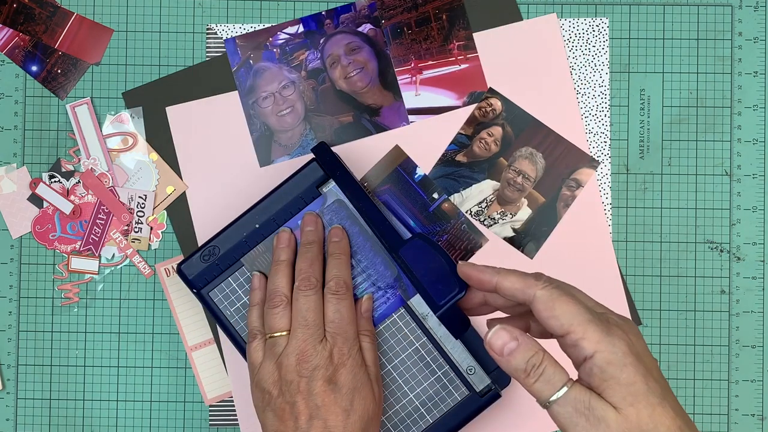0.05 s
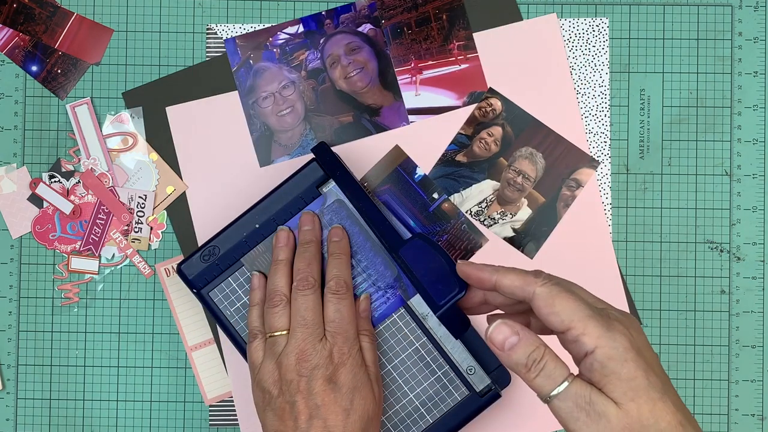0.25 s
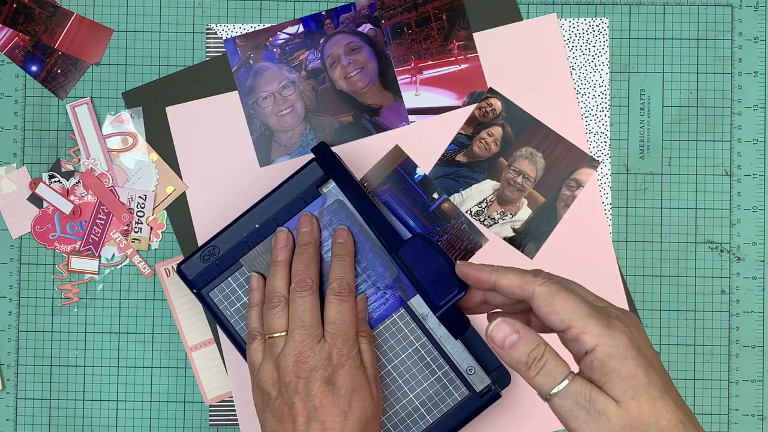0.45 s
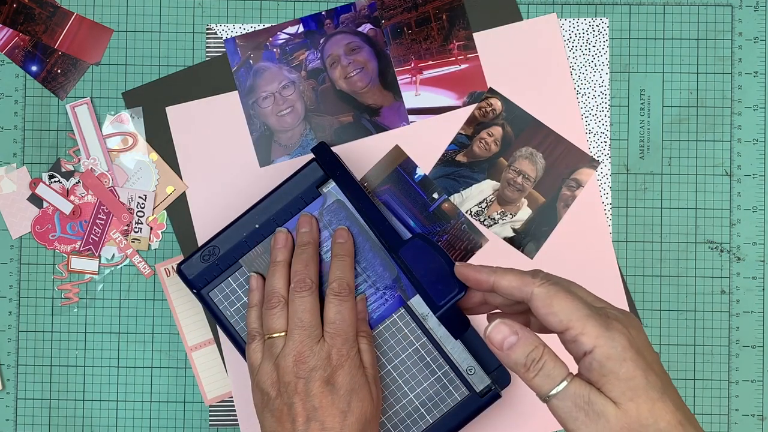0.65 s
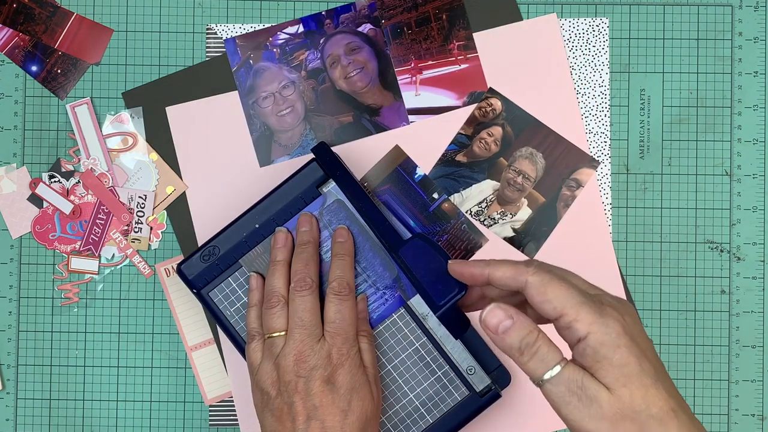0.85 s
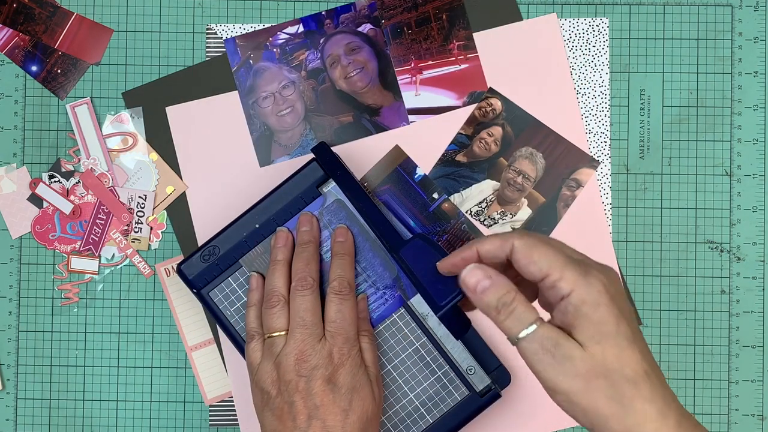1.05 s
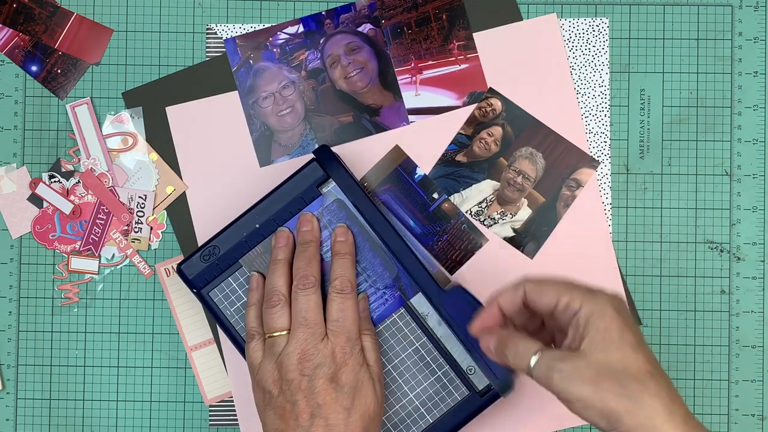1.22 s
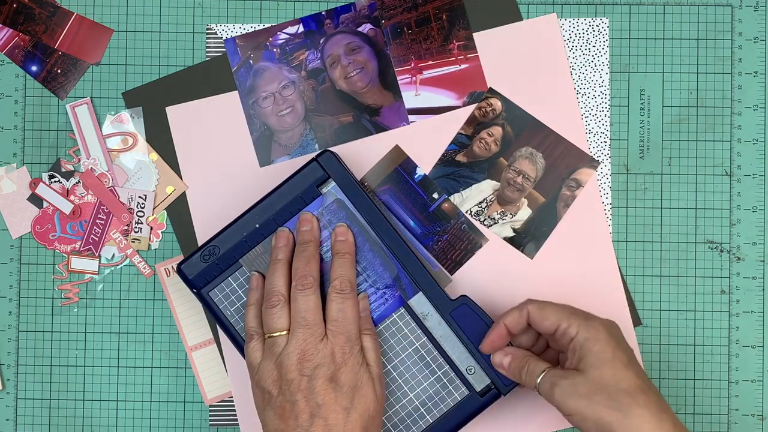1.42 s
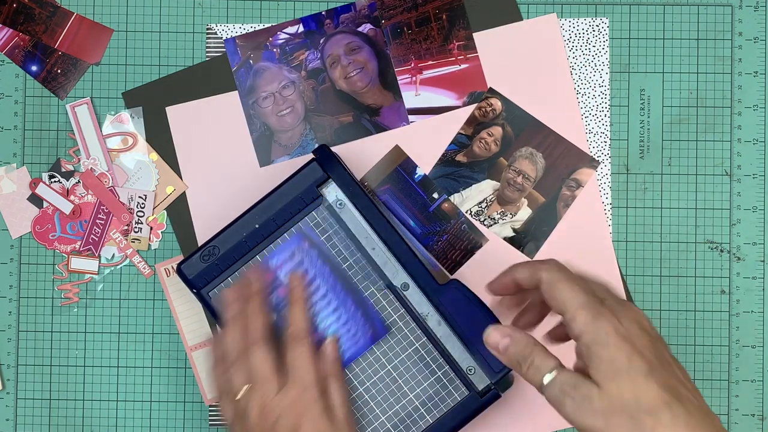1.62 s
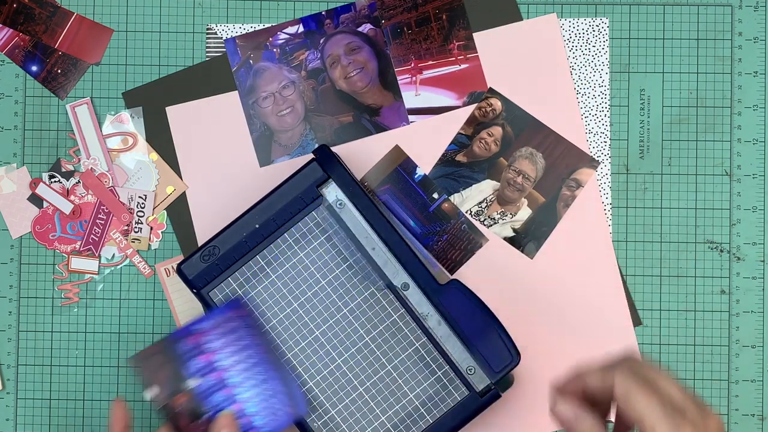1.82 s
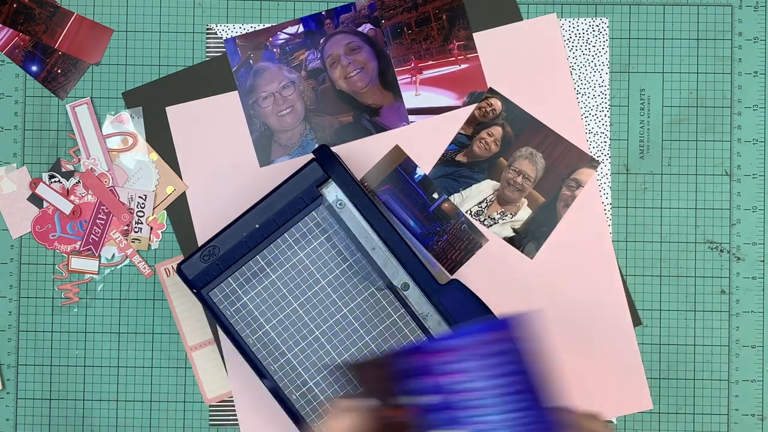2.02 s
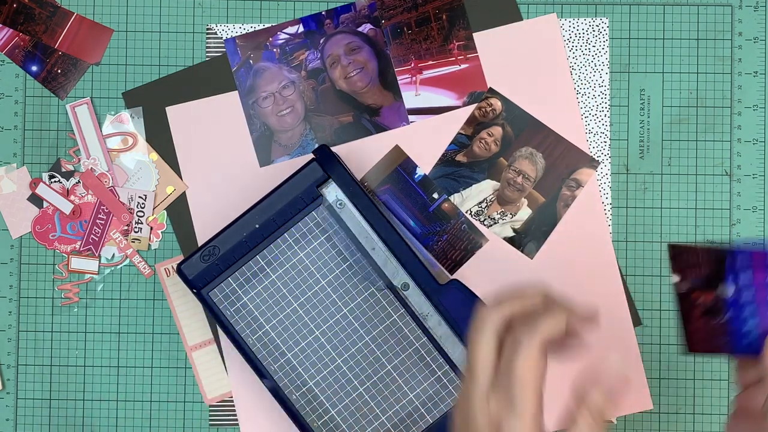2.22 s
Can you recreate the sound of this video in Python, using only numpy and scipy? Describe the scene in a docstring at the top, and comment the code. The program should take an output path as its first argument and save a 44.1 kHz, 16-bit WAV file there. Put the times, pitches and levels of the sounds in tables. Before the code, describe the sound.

For the first second there is only the faint low rumble of a small room. At about 1.1 seconds the carriage of a plastic paper trimmer clicks lightly. From 1.2 seconds its blade rasps through a photo print, rapidly getting faster and louder, with a tiny squeak near the peak. At about 1.35 seconds the carriage slams into the end stop, by far the loudest moment: a sharp clack, a short rattle and a hollow thump that briefly overload the close microphone, while the desk booms faintly. A small knock follows at 1.5 seconds. Then the glossy print hisses softly over the trimmer bed as fingers rub and grip it. It pops once through a bend at about 1.85 seconds, slightly to the left. Faint sliding, rustling and light taps continue until about 2.3 seconds as it is carried away.

```python
"""A plastic paper trimmer cuts a photo print, heard from close above a craft desk in a small room.
The carriage clicks down and its blade rasps faster and faster as fibres snap and shake the rail.
It slams into the end stop: the shell rattles, the hollow bed thumps and the microphones overload.
The hands let go; the print hisses over the bed, pops through a bend and is carried away.
Underneath, the desk booms faintly and the room hums with a low rumble."""
import sys
import numpy as np
from scipy import signal
from scipy.fft import rfft, irfft, next_fast_len
from scipy.io import wavfile

SR = 44100
rng = np.random.default_rng(int(sys.argv[2]) if len(sys.argv) > 2 else 0)


def unload_wav(signal):
    """Save mono or channel-first audio to the path in sys.argv[1] as 16-bit WAV at rate SR, clipped to [-1, 1]."""
    wavfile.write(
        sys.argv[1],
        SR,
        np.round(np.clip(np.atleast_2d(signal).T, -1, 1) * 32767).astype(np.int16),
    )


N = 99886
TIME = np.arange(N) / SR

# tone of the cut's rasp: freq_hz, relative_db
RASP_EQ = [(80, -14), (250, -2.5), (380, -6), (600, -2), (1250, -6.5), (1700, -3), (3500, 0), (5200, 6),
           (7500, -3.5), (10500, -4), (16000, -5.5)]
# hollow scrape of the runner in its groove: freq_hz, relative_db
SCRAPE_EQ = [(150, -7), (330, -7.5), (500, -2), (850, -4), (1060, -1), (1250, -13), (1600, -3.5),
             (2600, -13), (6000, -29)]
# resonances of the rail under the blade: pitch_hz, width_hz, boost_db
RAIL_PEAKS = [(475, 110, 7), (750, 70, 4.5), (1037, 140, 5.5), (1520, 82, 5), (1790, 69.7, 9),
              (2300, 200, 1), (3384, 180, 9.5), (4344, 110, 10.5), (8490, 750, 5)]
# two blade squeaks, then a finger dragging on the bed: start_s, length_s, pitch_hz, level_db, left_db
SQUEAKS = [(1.295, .014, 1578, -21, 8), (1.294, .013, 2445, -21, 0), (1.54, .038, 520, -38.5, 2)]
# clicks of fingers, carriage and blade: faint finger ticks, the carriage's clicks and rattles, and the blade
# snapping out of the print's edge: start_s, level_db, length_s, low_cut_hz, high_cut_hz, ring_hz
CLICKS = [(0.972, -53, 0.0099, 1198, 2896, 2300), (1.01, -54.5, 0.025, 1196, 2595, 2300),
          (1.038, -53.5, 0.0077, 1200, 2500, 3350), (1.094, -24, 0.007, 1200, 14900, 3350),
          (1.166, -41, 0.009, 1504, 12000, 4100), (1.314, -20, 0.0062, 5450, 14000, 8400),
          (1.3333, -13, 0.013, 498, 5500, 2850), (1.339, 1.5, 0.007, 250, 9600, 3000),
          (1.346, -18, 0.0057, 700, 3500, 2030), (1.361, -22.5, 0.027, 408, 8980, 1960),
          (1.4909, -28.5, 0.011, 610, 1300, 1030), (1.68, -45.5, 0.0034, 200, 1500, 500),
          (2.161, -40, 0.0059, 500, 1990, 1800)]
# tone of hard plastic contact: freq_hz, relative_db
PLASTIC_EQ = [(100, -6.5), (450, 4.5), (900, -9), (1500, -4.5), (3300, 0.5), (5200, -2), (8000, -3.5),
              (11000, -8), (16000, -1.5)]
# resonances of the carriage's shell: pitch_hz, width_hz, boost_db
SHELL_PEAKS = [(715, 36, 4.5), (1046, 150, 8), (1540, 130, 9), (2080, 160, 7.5), (2360, 71, 5.5),
               (2843, 170.5, 2.5), (3428, 100, 5.5), (4100, 260, 9.5), (6660, 400, 4.5), (8370, 1000, 7)]
# blows on the trimmer bed: start_s, level_db, high_cut_hz, low_cut_hz
BED_KNOCKS = [(1.096, -49.5, 710, 396), (1.309, -19, 295, 40.2), (1.339, -37, 643, 470),
              (1.3436, 9.5, 270, 41), (1.366, -14, 380, 40.4), (1.4986, -18, 670, 439),
              (2.105, -38, 615, 99.7), (2.246, -41.5, 280, 97.2)]
# modes of the bed: pitch_hz, level_db, t60_s
BED_MODES = [(235.6, -3, 0.056), (256, -1, 0.07), (296, -17, 0.12), (413.6, -8, 0.08), (508, -4.5, 0.088),
             (693, -10.5, 0.065)]
# pulls of the print over the bed: start_s, length_s, level_db, attack_s
PRINT_SLIDES = [(1.48, 0.0047, -43.5, .003), (1.5, 0.075, -56.5, 0.03), (1.559, 0.072, -36.5, 0.054),
                (1.625, 0.022, -35, 0.022), (1.643, 0.17, -43, 0.023), (1.79, 0.015, -36.5, 0.014),
                (1.834, 0.049, -52.5, 0.011), (1.928, 0.14, -50.5, 0.054), (2.134, 0.08, -44.5, 0.018)]
# hiss of sliding glossy paper: freq_hz, relative_db
SLIDE_EQ = [(500, -30), (1200, -16.5), (3000, -10.5), (5200, -4), (7500, 0), (13500, 1.5), (16000, -2)]
# fingers rubbing on the bed: start_s, length_s, level_db
FINGER_RUBS = [(1.489, 0.085, -42), (1.601, 0.1, -50), (1.765, 0.025, -50.5), (1.849, 0.007, -31.5),
               (2.095, 0.017, -46.5), (2.134, 0.093, -49)]
# dull tone of that rubbing: freq_hz, relative_db
RUB_EQ = [(60, -2), (150, 4.5), (300, 6), (420, 4), (520, 3.5), (650, -14.5), (1200, -7.5), (4000, -39.5)]
# fingers gripping the print: start_s, length_s, level_db
FINGER_GRIPS = [(1.515, 0.17, -50.5), (1.568, 0.037, -50), (1.767, 0.1, -50), (1.823, 0.01, -44),
                (1.886, 0.0173, -47.5), (1.942, 0.119, -59.5), (2.065, 0.013, -48), (2.131, 0.04, -43.5),
                (2.208, 0.017, -44)]
# tone of the print's rustle: freq_hz, relative_db
RUSTLE_EQ = [(300, -36), (900, -3.5), (1500, -1.5), (2500, -1), (4500, 0.5), (9000, -15)]
# pops of the buckling print: start_s, level_db
PRINT_POPS = [(1.8352, -42), (1.8434, -24.5), (1.8555, -40.5)]
# modes of the bent print: pitch_hz, level_db, t60_s
PRINT_MODES = [(325, -10, 0.092), (467, -36, 0.06), (665, -13.5, 0.12), (1000, -5, 0.038),
               (1206, -2.5, 0.049), (1240, 9.5, 0.0072), (1440, -2, 0.041), (2175, -2, 0.036),
               (2500, -1, 0.048)]
# shoves on the desk: start_s, level_db
DESK_SHOVES = [(1.0, -45), (1.16, -46.5), (1.21, -46.5), (1.53, -46), (1.309, -27.5), (1.347, -22),
               (1.366, -49), (1.43, -36.5), (1.625, -43.5), (1.678, -39), (1.72, -44), (1.758, -46.5),
               (1.845, -46)]
# modes of the desk top: pitch_hz, level_db, t60_s
DESK_MODES = [(52.7, 7.5, 0.21), (40, -15, 0.074), (83.2, -12, 0.027)]
# how far the left microphone port leads the right: freq_hz, lead_rad
PORT_PHASE = [(100, 1.5), (500, -0.4), (1800, 1.19), (2500, 0.25), (3700, 4.5), (5300, 2.5), (7000, 0.78),
              (8600, 0.5), (10400, -4), (13500, -5.5), (16000, -8.5)]
# strength of the room's tail: freq_hz, level_db
REVERB_EQ = [(130, -13), (260, -15), (550, -5.5), (2000, -6.5), (6000, -10), (14000, -18)]
# decay of the room's tail: freq_hz, t60_s
REVERB_DECAY = [(100, 0.29), (400, 0.24), (2000, 0.27), (6000, 0.33), (15000, 0.27)]
# tone of the still room: freq_hz, relative_db
ROOM_TONE_EQ = [(20, -20.5), (35, -13.5), (53, 4), (80, -14), (130, -15), (250, -21.5), (500, -31.5),
                (1200, -38.5), (4000, -43.5), (15000, -47)]

PUSH_S, STOP_S = 1.165, 1.338   # the carriage sets off; it meets the end stop


def blade():
    """Fibres snap and shake the rail; rasp, grain rate, scrape and rumble climb with the speed."""
    speed = np.interp(TIME, [PUSH_S, STOP_S], [.17, 1])   # share of the final speed
    moving = (TIME > PUSH_S) * (TIME < STOP_S)
    glide = from_db(-33.5) * speed * moving
    snaps_per_s = 20000 * speed
    fibres = grains(snaps_per_s, spread_db=1.6) * flutter(hz=150, depth_db=1.0)
    tearing = fibres * together([glide, bite(TIME)])
    crackle = soften(grains(snaps_per_s, spread_db=4.0), 7500, "high")
    coating = crackle * bite(TIME - 0.011)   # the gloss parts just after the fibres
    rumble_hz = 360.3 + 1136 * speed ** 2   # the rail's roughness passes ever faster under the runner
    rumble = from_db(-1) * rms_one(slow_noise(hz=100) * np.cos(phase(rumble_hz))) * glide * np.sqrt(speed)
    scrape = from_db(-36) * rng.standard_normal(N) * speed ** (3 / 4) * moving
    return colour(tearing + coating + rumble, RASP_EQ, RAIL_PEAKS) + colour(scrape, SCRAPE_EQ, RAIL_PEAKS)


def bite(time, deepest_s=1.303, hold_s=0.012, rise_db_per_s=322.5, fall_db_per_s=1598):
    """Envelope of the cut: it deepens, holds and drops as the blade leaves the print."""
    entering_db = rise_db_per_s * np.maximum(deepest_s - time, 0)
    leaving_db = fall_db_per_s * np.maximum(time - deepest_s - hold_s, 0)
    return from_db(-13 - entering_db - leaving_db)


def squeak(start_s, length_s, pitch_hz, level_db, left_db):
    """Stick-slip makes one resonance swell and sing for a moment, its pitch wavering slightly."""
    wavering_hz = pitch_hz * (1 + .01 * rms_one(slow_noise(hz=81.3)))
    tone = rms_one(np.sin(phase(wavering_hz)))
    swell = gesture(start_s, length_s, level_db, attack_s=length_s, release_db_per_s=900.5)
    return pan(tone * swell, left_db)


def carriage():
    """Fingers tick faintly, the carriage clicks on its rail, the blade snaps out of the print's edge, and the
    carriage rattles after hitting the end stop."""
    return colour(sum(chatter(*row) for row in CLICKS), PLASTIC_EQ, SHELL_PEAKS)


def chatter(start_s, level_db, length_s, low_cut_hz, high_cut_hz, ring_hz):
    """A dying burst of plastic on plastic; the touched part rings on two modes of its own."""
    dying = np.exp(-(TIME[:SR // 10] / length_s) ** 2)
    contact = band_limit(flat_burst(dying, len(dying)), low_cut_hz, high_cut_hz)
    ringing = sum(from_db(db) * signal.lfilter(*signal.iirpeak(hz, Q=16, fs=SR), contact)
                  for hz, db in [(ring_hz, 3), (ring_hz * 1.23, 0.5)])
    click = from_db(level_db) * rms_one(contact + ringing) * np.sqrt(np.mean(dying ** 2))
    return np.pad(click, (int(start_s * SR), N))[:N]


def bed():
    """The hollow bed thumps; a soft contact leaves out its higher modes, a light one its lowest."""
    blows = sum(band_limit(taps([(start_s, level_db)]), low_cut_hz, high_cut_hz)
                for start_s, level_db, high_cut_hz, low_cut_hz in BED_KNOCKS)
    return ring(blows, BED_MODES)


def handling():
    """Glossy paper hisses over the bed while fingers rub; gripping and sliding both rustle the print."""
    sliding = together(gesture(*row, release_db_per_s=338) for row in PRINT_SLIDES)
    rubbing = together(gesture(*row) for row in FINGER_RUBS)
    gripping = together(gesture(*row) for row in FINGER_GRIPS)
    bending = together([gripping, from_db(-19.5) * sliding])
    hiss = grains(10000, spread_db=-0.5) * flutter(hz=35, depth_db=1.2) * sliding
    rub = rng.standard_normal(N) * rubbing
    rustle = grains(2300, spread_db=-2.0) * flutter(hz=49.9, depth_db=2.5) * bending
    return colour(hiss, SLIDE_EQ) + colour(rub, RUB_EQ) + colour(rustle, RUSTLE_EQ)


def buckle():
    """The stiff print pops through a bend as it is lifted."""
    return ring(soften(taps(PRINT_POPS), hz=1700, order=4), PRINT_MODES)


def desk():
    """The desk top booms faintly under every shove."""
    return ring(soften(taps(DESK_SHOVES), hz=109.6), DESK_MODES)


def microphones(x, desk_db, desk_t60_s, low_hz=898, high_hz=7700):
    """Two ports hear the sound out of step; in the mids each gets its own quick desk reflections."""
    size, hz = fft_grid()
    dying = from_db(-60 * TIME[:SR // 20] / desk_t60_s)
    scatter = flat_burst(dying, (2, len(dying)))
    scatter /= np.sqrt(np.sum(scatter ** 2, axis=1, keepdims=True))
    reflected = from_db(desk_db) * hz ** 2 / (hz ** 2 + low_hz ** 2) / (1 + (hz / high_hz) ** 4)
    direct = np.exp(.5j * at_hz(PORT_PHASE, hz) * np.array([[1], [-1]]))
    response = np.sqrt(1 - reflected ** 2) * direct + reflected * rfft(scatter, size)
    return irfft(rfft(x, size) * response)[:, :N]


def reverb(x, build_s):
    """The small room's diffuse tail, unrelated in each ear, dies away band by band."""
    age, tail = TIME[:SR * 2 // 3], 0
    edges_hz = np.geomspace(100, 18000, 11)
    white = rng.standard_normal((2, 2, len(age)))
    for k, (low, high) in enumerate(zip(edges_hz, edges_hz[1:])):
        hz = np.sqrt(low * high)
        decay = from_db(-60 * age / at_hz(REVERB_DECAY, hz)) * (1 - np.exp(-age / build_s))
        band = signal.sosfilt(signal.butter(2, [low, high], "band", fs=SR, output="sos"), white[k % 2])
        tail = tail + from_db(at_hz(REVERB_EQ, hz)) * band * decay / np.sqrt(np.sum(decay ** 2))
    return signal.fftconvolve(x[None], tail, axes=1)[:, :N]


def room_tone():
    """A low, centred rumble under a faint, wide hiss."""
    rumble = soften(rng.standard_normal(N), hz=690, order=1)
    hiss = soften(rng.standard_normal((2, N)), 680, "high", order=1)
    return from_db(-53.5) * colour(rumble + hiss, ROOM_TONE_EQ)


def gesture(start_s, length_s, level_db, attack_s=0.0028, release_db_per_s=599):
    """Envelope of one movement, by default a quick touch: it swells, holds and dies away."""
    age = TIME - start_s
    release_db = release_db_per_s * np.maximum(age - length_s, 0)
    return np.clip(age / attack_s, 0, 1) * from_db(level_db - release_db)


def together(gains):
    """Overlapping movements add in power."""
    return np.sqrt(sum(gain ** 2 for gain in gains))


def grains(per_s, spread_db):
    """Random tiny snaps of uneven size, with unit power at any rate."""
    sizes = from_db(spread_db * np.minimum(rng.exponential(1, N), 4)) * rng.choice([-1, 1], N)
    return rms_one(sizes * (rng.random(N) < per_s / SR) / np.sqrt(per_s))


def flutter(hz, depth_db):
    """Uneven friction: a gain that wanders at about this rate."""
    return from_db(depth_db * rms_one(slow_noise(hz)))


def slow_noise(hz):
    """Low-passed noise."""
    return soften(rng.standard_normal(N), hz)


def flat_burst(envelope, shape):
    """A noise burst with its spectrum evened out, so it brings little colour of its own."""
    length = len(envelope)
    spectrum = rfft(rng.standard_normal(shape) * envelope, 2 * length)
    return irfft(spectrum / (np.abs(spectrum) + 1e-12))[..., :length] * envelope ** (1 / 4)


def taps(rows):
    """One impulse for each row."""
    out = np.zeros(N)
    for start_s, level_db in rows:
        out[int(start_s * SR)] += from_db(level_db)
    return out


def ring(push, modes):
    """Each push sets every mode swinging and dying away."""
    out = 0
    for pitch_hz, level_db, t60_s in modes:
        decay = from_db(-60 / (t60_s * SR))
        feedback = [1, -2 * decay * np.cos(2 * np.pi * pitch_hz / SR), decay ** 2]
        out = out + from_db(level_db) * signal.lfilter([.5, 0, -.5], feedback, push + 1e-18)
    return out


def colour(x, eq, peaks=()):
    """A smooth EQ curve with resonances on top, scaled to unit power."""
    size, hz = fft_grid()
    boost = 1 + sum((from_db(db) ** 2 - 1) / (1 + (2 * (hz - f) / width) ** 2) for f, width, db in peaks)
    gain = rms_one(from_db(at_hz(eq, hz)) * np.sqrt(np.maximum(boost, 1e-3)))
    cepstrum = irfft(np.log(gain))
    cepstrum[1:size // 2] *= 2   # minimum phase: resonances ring after the blow, never before
    cepstrum[size // 2 + 1:] = 0
    return irfft(rfft(x, size) * np.exp(rfft(cepstrum)))[..., :N]


def soften(x, hz, kind="low", order=2):
    """Butterworth low- or high-pass."""
    return signal.sosfilt(signal.butter(order, hz, kind, fs=SR, output="sos"), x + 1e-18)


def band_limit(x, low_cut_hz, high_cut_hz):
    """Roll off top and bottom."""
    return soften(soften(x, high_cut_hz), low_cut_hz, "high")


def pan(x, left_db):
    """Stereo with the left side louder by left_db."""
    return x * from_db([[left_db / 2], [-left_db / 2]])


def phase(hz):
    """Running phase of a moving pitch."""
    return 2 * np.pi * np.cumsum(hz) / SR


def fft_grid():
    """Padded FFT size and its frequencies."""
    size = 2 * next_fast_len(N)
    return size, np.arange(size // 2 + 1) * SR / size


def at_hz(points, hz):
    """Read a table on a log-frequency axis."""
    freq_hz, value = np.transpose(points)
    return np.interp(np.log(hz + 1e-9), np.log(freq_hz), value)


def from_db(db):
    """Decibels to gain."""
    return 10 ** (np.asarray(db) / 20)


def rms_one(x):
    """Scale to unit power."""
    return x / np.sqrt(np.mean(x ** 2) + 1e-20)


def scene():
    """Trimmer, print and hands up close, the room behind; moving sources blur their desk reflections."""
    hits, cut, hands, pops = carriage() + bed(), blade(), handling(), buckle()
    squeaks = sum(squeak(*row) for row in SQUEAKS)
    close = (microphones(hits, desk_db=0, desk_t60_s=0.0054, low_hz=1090, high_hz=9030)
             + microphones(cut, desk_db=-4.5, desk_t60_s=0.016)
             + microphones(hands, desk_db=-5, desk_t60_s=0.039)
             + squeaks + pan(pops, left_db=6.5))   # the print is lifted on the left
    send = hits + cut + hands + pops + squeaks.mean(axis=0)
    return close + reverb(send, build_s=0.00023) + desk() + room_tone()


def record(dry):
    """The slam clips just under full scale; a steep filter cuts the very top."""
    high_cut = signal.ellip(10, .1, 80, 15750, fs=SR, output="sos")
    return signal.sosfilt(high_cut, np.clip(dry, -.97, .97))


dry = scene()
out = record(dry)
unload_wav(out)
```